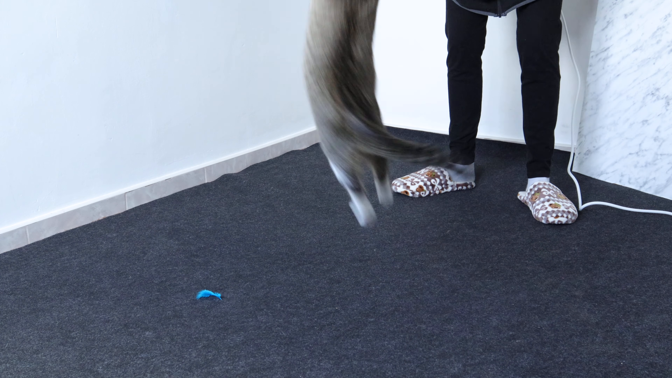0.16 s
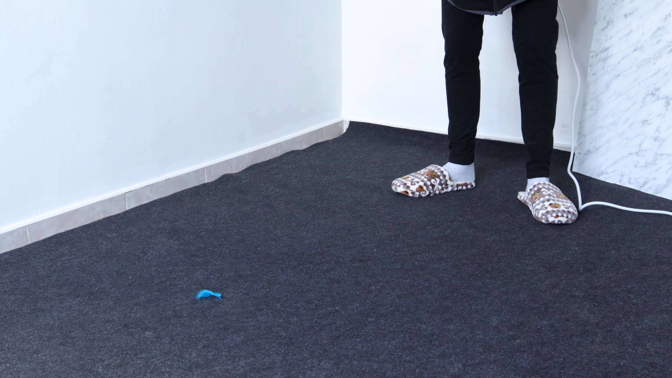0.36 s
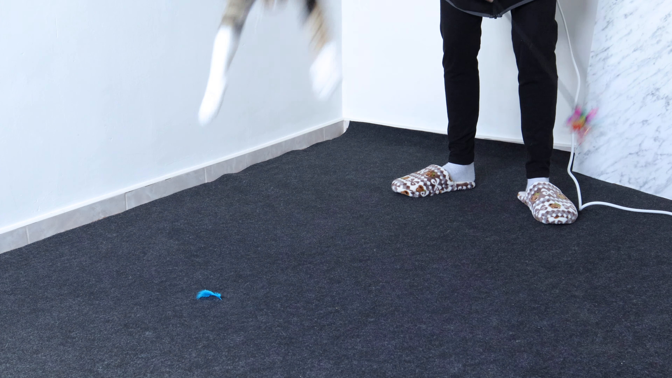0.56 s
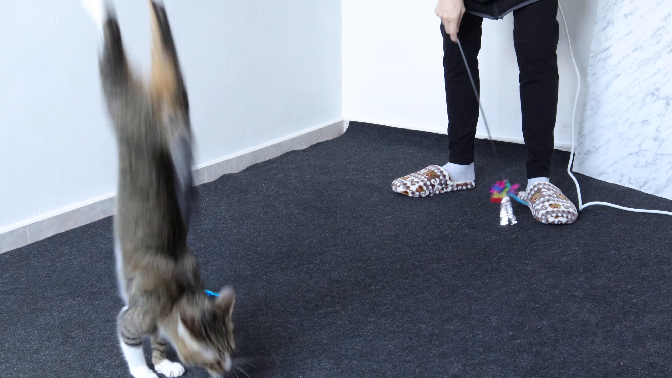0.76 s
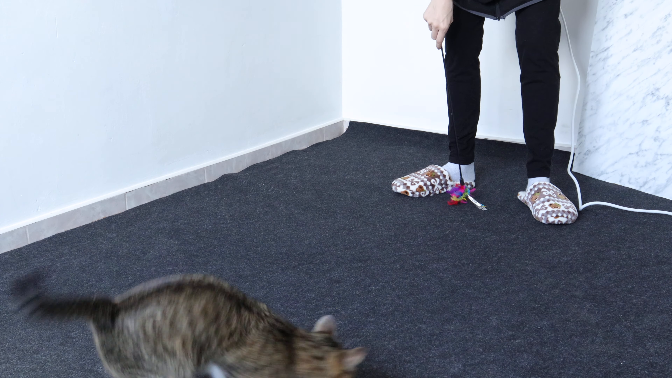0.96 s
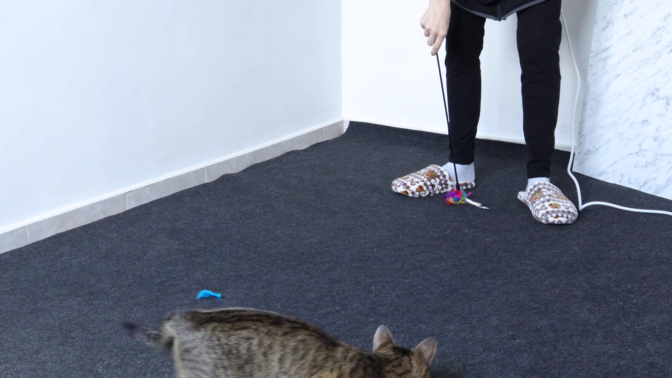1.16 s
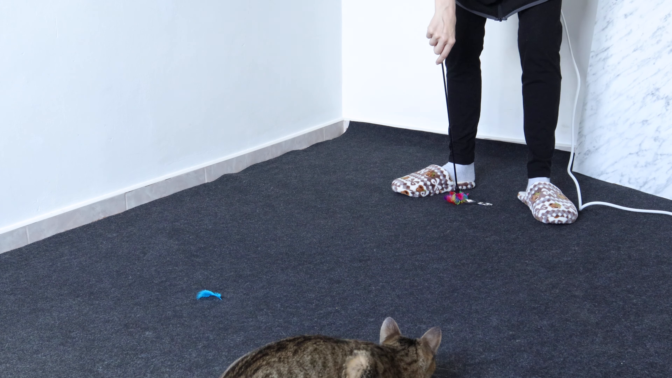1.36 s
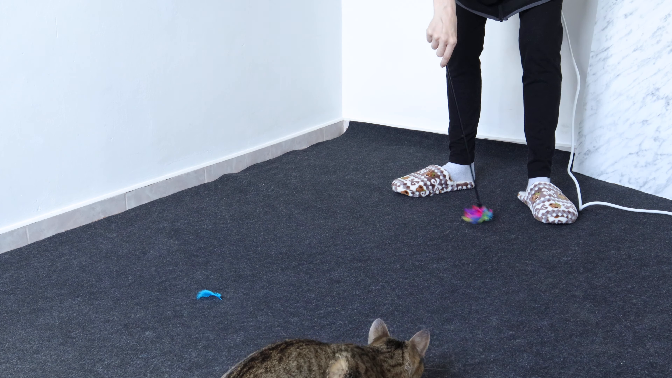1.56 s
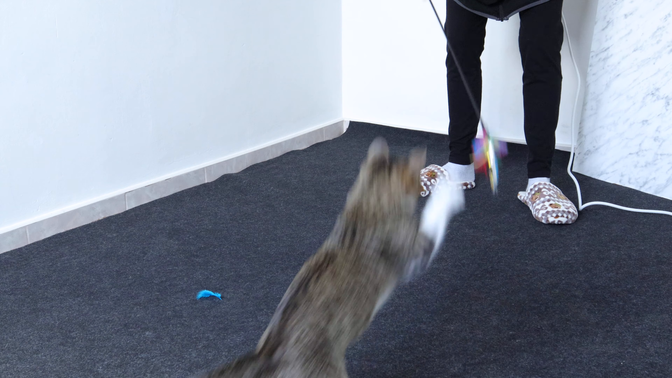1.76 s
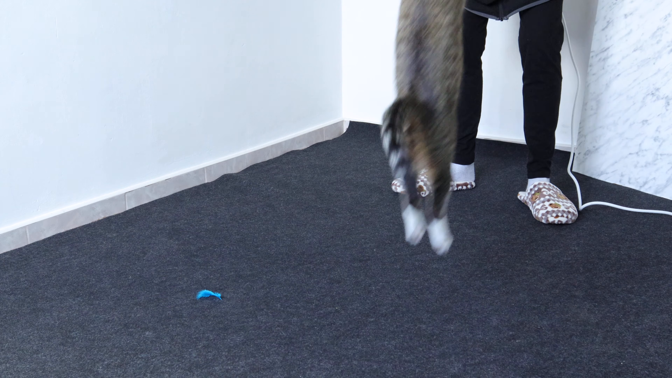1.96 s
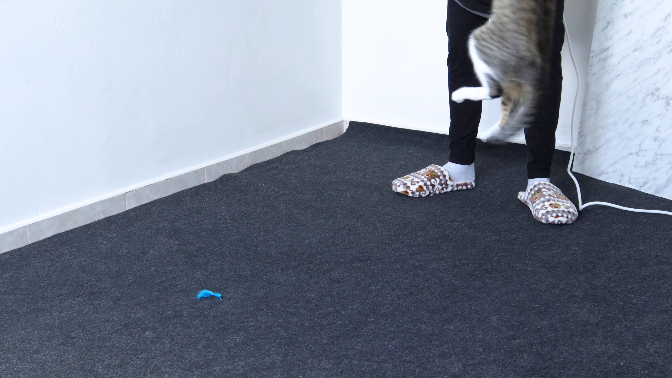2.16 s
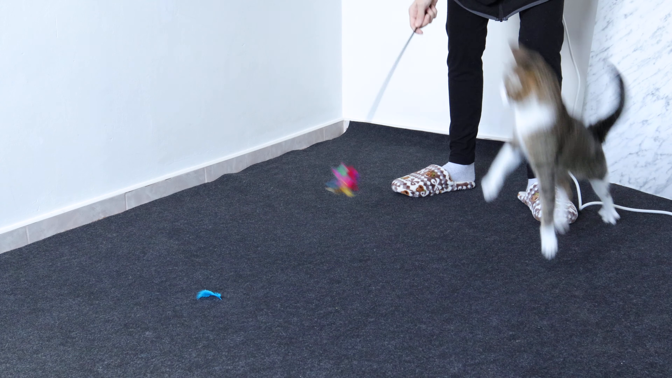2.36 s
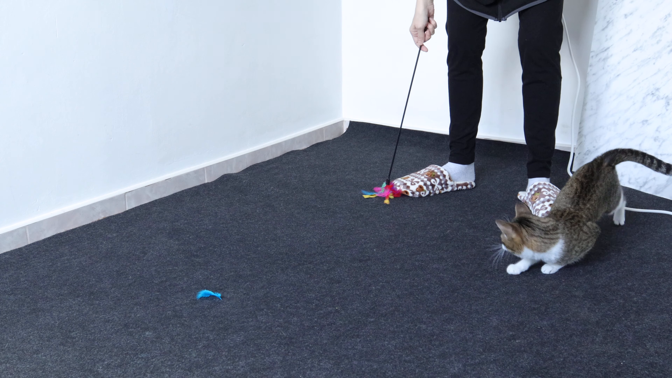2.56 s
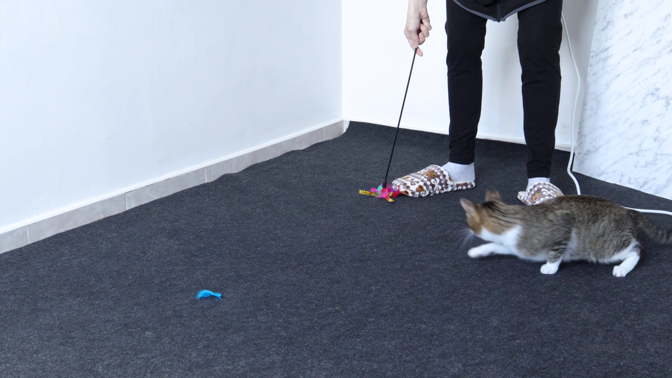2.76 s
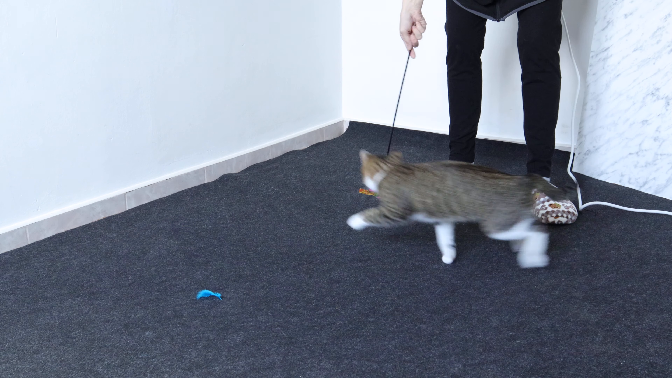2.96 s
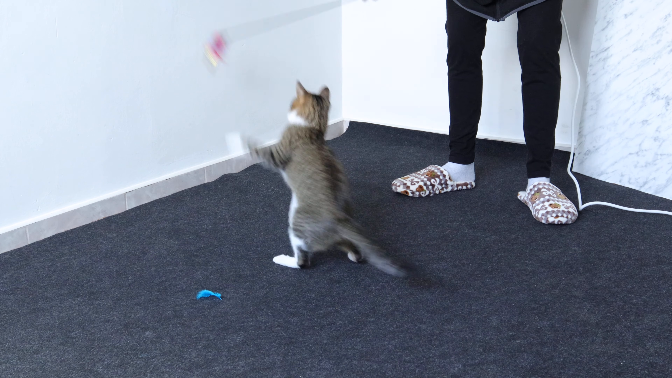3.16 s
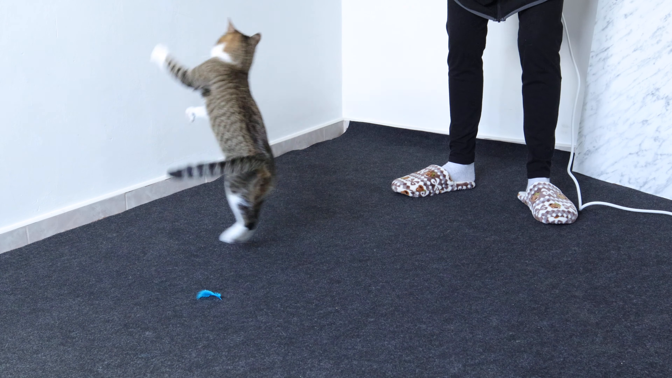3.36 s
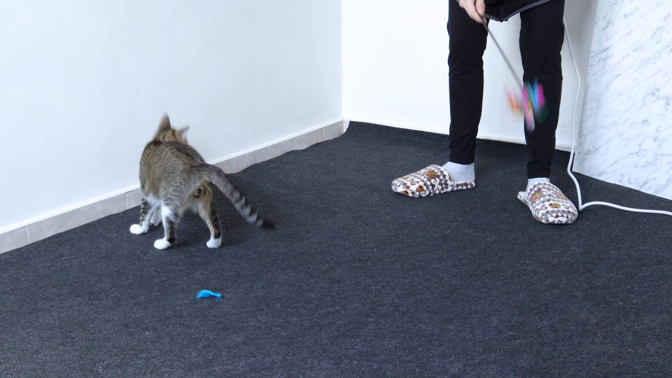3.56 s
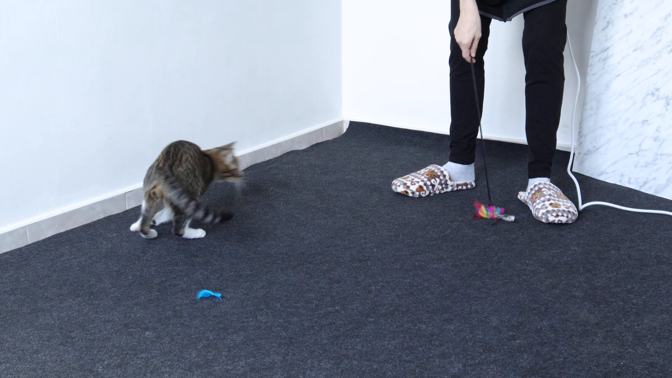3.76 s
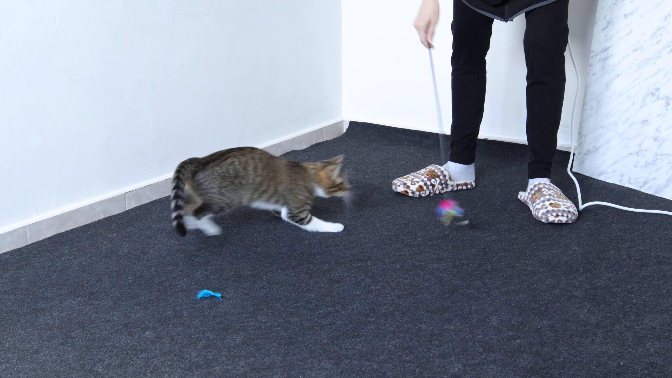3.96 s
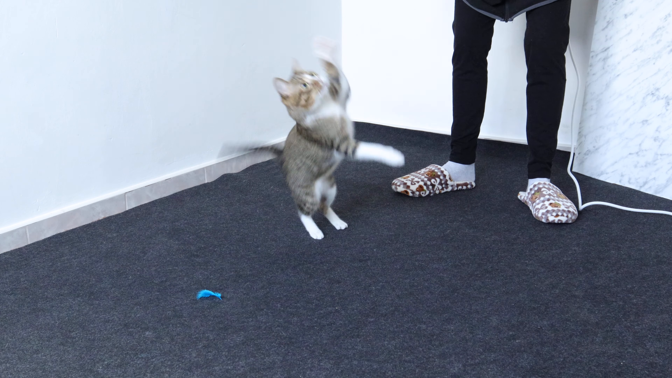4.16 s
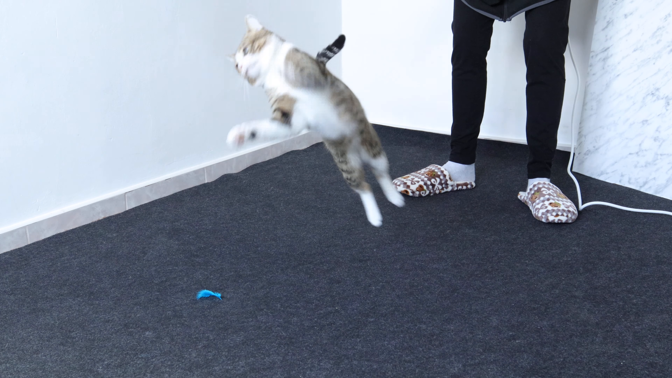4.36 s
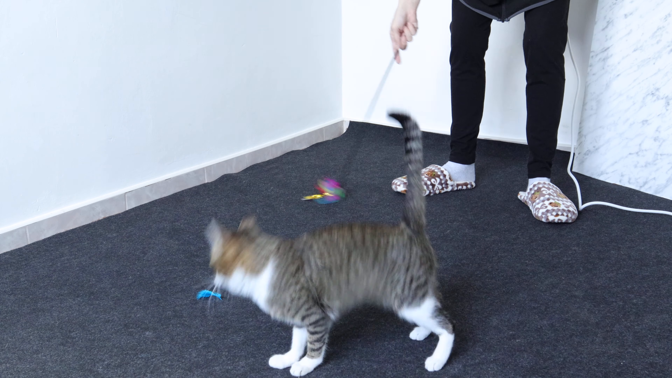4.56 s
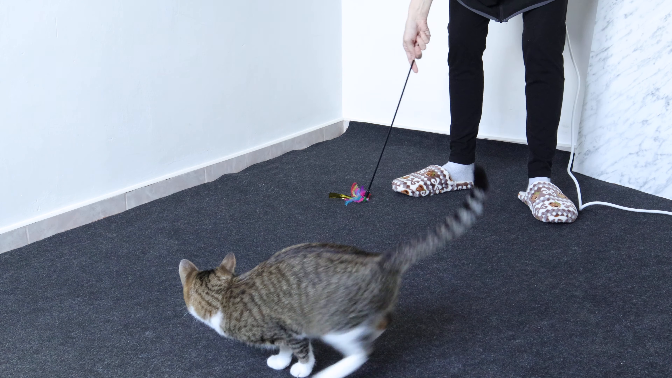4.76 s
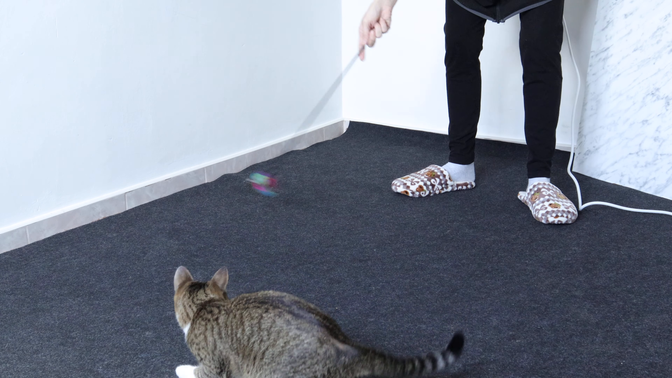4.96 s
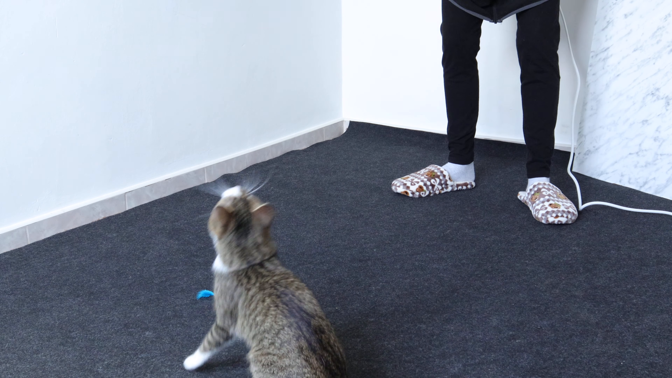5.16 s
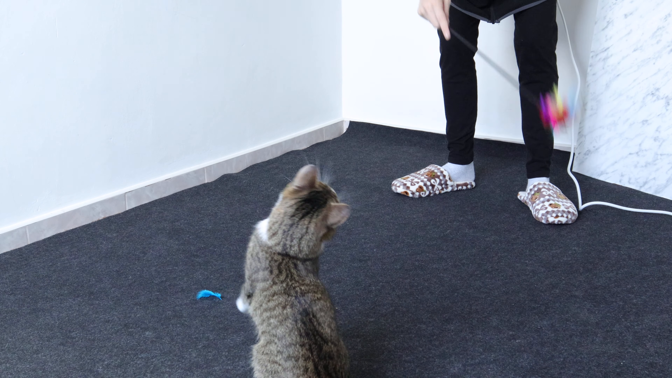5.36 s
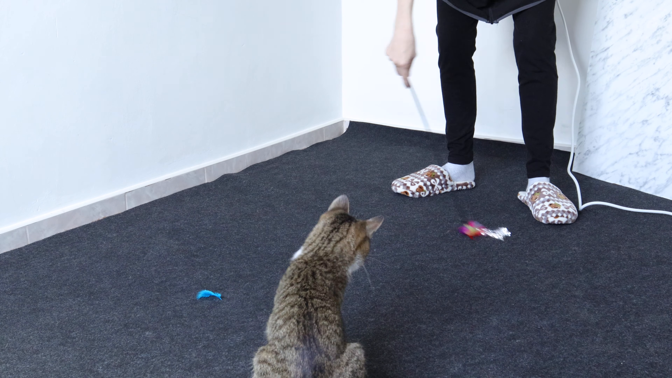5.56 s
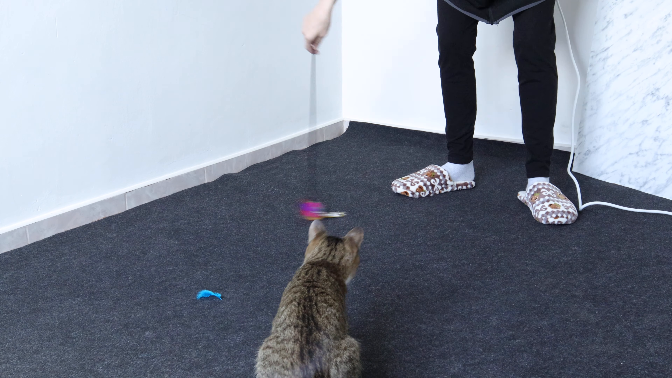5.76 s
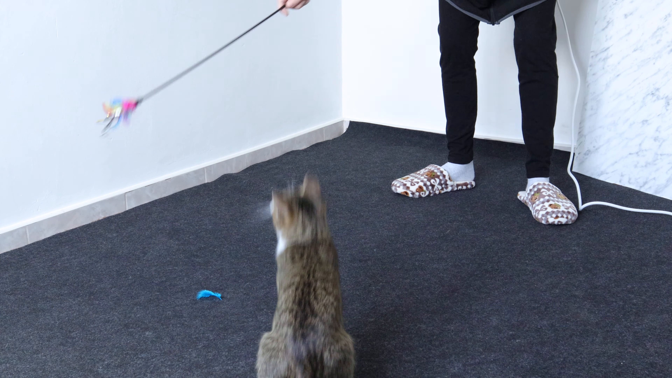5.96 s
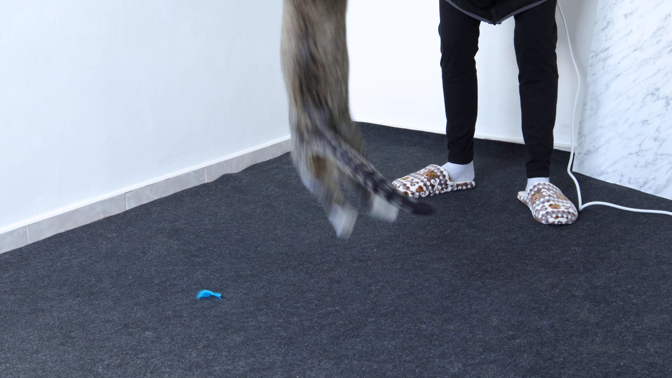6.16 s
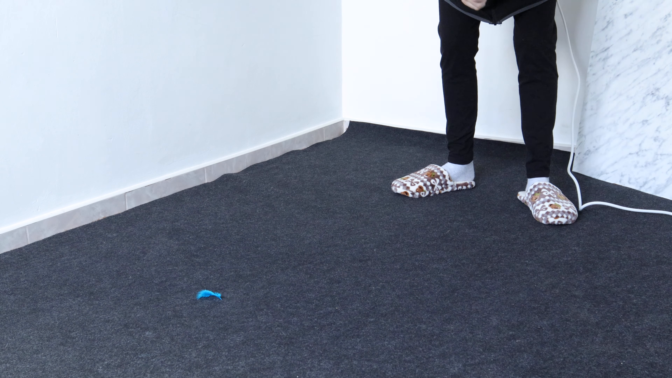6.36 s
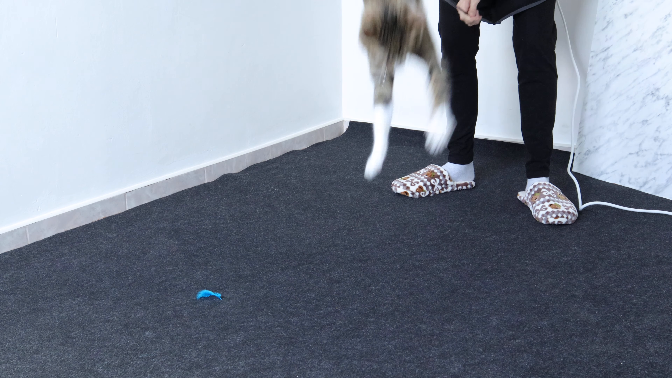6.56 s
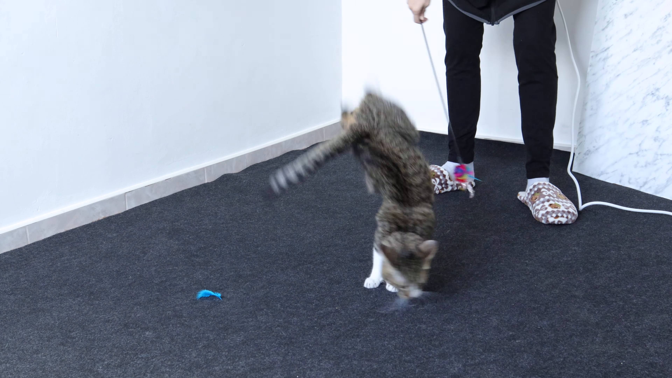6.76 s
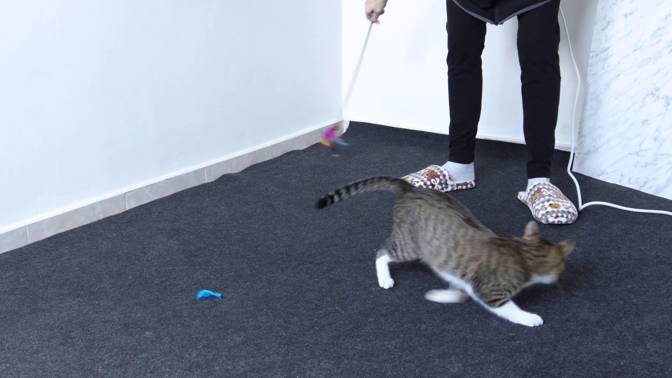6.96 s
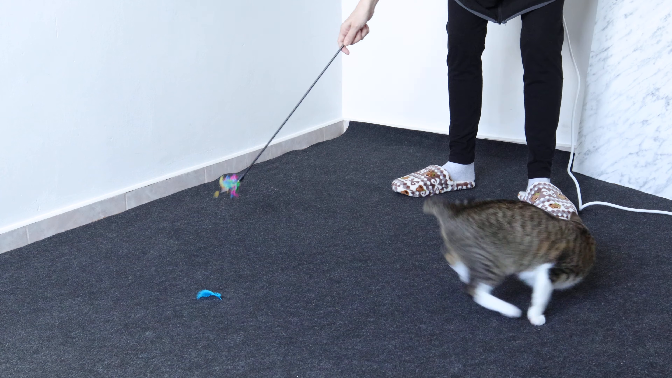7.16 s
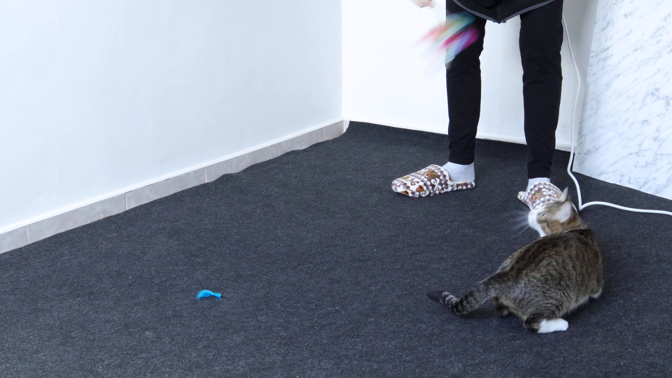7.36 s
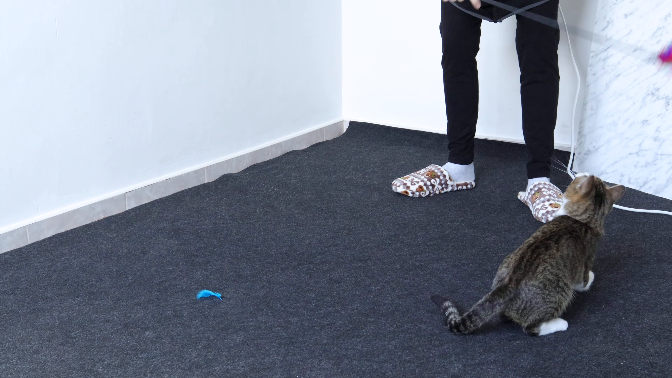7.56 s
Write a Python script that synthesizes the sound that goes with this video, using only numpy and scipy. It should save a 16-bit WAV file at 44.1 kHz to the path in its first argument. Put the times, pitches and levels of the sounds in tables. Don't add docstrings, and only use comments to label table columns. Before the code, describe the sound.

Close stereo pickup in a small bare room: low room tone and faint microphone hiss. A light foil swish opens, with tiny ticks at 0.3-0.4 s. At 0.87 s the cat lands in a heavy, dull double thump on thin carpet, with low floor resonance and brief scuffing. From 1 to 2.4 s it is mostly quiet: small crinkles, a claw tick and soft push-off at 1.8, a foil snap at 1.97. At 2.52 comes the loudest landing, two quick thuds with a sharp claw scratch. Scampering pats and scrapes follow, with a deep knock near 3.25 and lighter thuds at 3.65 and 4.2. A firm thump lands at 4.66, then a bright swish at 5.03 and sparse rustles. Foil crackles vividly from 6.23 to 6.6; the cat lands at 6.82, scuffs and snaps foil around 7, then fades into small steps.

```python
import sys
import numpy as np
from scipy import signal
from scipy.fft import rfft, irfft, next_fast_len
from scipy.io import wavfile
from scipy.ndimage import uniform_filter1d

SR = 44100
rng = np.random.default_rng(int(sys.argv[2]) if len(sys.argv) > 2 else 0)


def invert_db(level):
    return 10 ** (np.asarray(level, dtype=float) / 20)


def unload_wav(signal):
    wavfile.write(
        sys.argv[1],
        SR,
        np.round(np.clip(np.atleast_2d(signal).T, -1, 1) * 32767).astype(np.int16),
    )


N = 336042

# (frequency [Hz], density [dB per Hz])
AIR_SPECTRUM = [(12, -31), (20, -8), (202, -1.5), (266, -2), (315, -2.5), (439, -5), (631, -4.5),
                (1160, -9.5), (1450, -9.5), (1820, -11), (2150, -12.5), (9930, -28), (11100, -49),
                (13100, -64), (15500, -72)]
# (frequency [Hz], coherence [-1 to 1])
AIR_LIKENESS = [(60, 1), (130, 0.43), (290, -0.27), (640, -0.5), (1410, -0.61), (3100, -0.7), (6820, -0.69),
                (15000, -1.1)]
# (frequency [Hz], density [dB per Hz])
SLAB_SPECTRUM = [(20, -48), (40, -9), (54, 11.5), (72, -6), (105, 6.5), (150, -2.2), (230, -33), (500, -78)]
# (peak time [s], level [dB], fall over 20 dB [s])
SHAKES = [(0.06, -46, .5), (0.87, -33, .33), (1.34, -50, .2), (1.9, -50, .32), (2.525, -29, .22),
          (2.82, -46, .55), (3.185, -38, .2), (3.265, -31, .14), (3.5, -51, .4), (3.61, -46, .2),
          (3.67, -38, .23), (4.06, -51, .5), (4.21, -42, .11), (4.46, -56, .2), (4.52, -44.5, .8),
          (4.73, -45, .22), (5.24, -54, .12), (5.6, -59, .9), (6.2, -50, .5), (6.83, -30, .13),
          (7.04, -40, .2), (7.3, -53, 2.2)]
# (frequency [Hz], density [dB per Hz])
HISS_SPECTRUM = [(1500, -16), (3000, -9), (4800, -8), (6800, -8), (8800, -3), (10700, 0), (13200, -14),
                 (15600, -26)]
# (frequency [Hz], density [dB per Hz])
RASP_SPECTRUM = [(150, -47), (300, -14), (700, -6), (1200, -2.5), (2400, -2.5), (3500, -7), (6000, -13),
                 (12000, -52)]
# (peak time [s], hiss level [dB], rasp level [dB re hiss], rise [s], fall over 20 dB [s])
STROKES = [(0.91, -51, 6, .055, .25), (1.59, -62, 3, .6, .3), (1.7, -51, 4.5, .12, .4),
           (1.975, -46, 4.5, .03, .18), (2.06, -59, -3, .06, .12), (2.57, -37.5, 9, .06, .1),
           (2.66, -53, 7, .08, .45), (2.84, -56, 9, .035, .16), (2.97, -47, 6.5, .04, .12),
           (3.18, -45, 8, .015, .15), (3.27, -52, 7, .04, .2), (3.36, -56, 7, .04, .15),
           (5.68, -52, 6, .025, .15), (3.84, -45, -3, .016, .16), (3.9, -46.5, -1.5, .05, .08),
           (1.19, -65, 11, .03, .15), (4.095, -46, 11.5, .03, .12), (4.2, -47, 2, .09, .12),
           (4.68, -55, 13, .04, .16), (5.14, -57, 3, .08, .25), (5.69, -52, 1.5, .035, .5),
           (5.92, -58, 5, .2, .2), (6.825, -45, 9, .017, .12), (7.03, -39.5, 3, .06, .085),
           (7.17, -52, .3, .02, .09), (7.4, -59.5, 4.5, .3, .6)]
# (peak time [s], hiss level [dB], rasp level [dB re hiss], rise [s], fall over 20 dB [s])
SWEEPS = [(0.04, -43, -4.5, .2, .11), (0.385, -55, -18, .015, .15), (2.25, -59.5, -12, .05, .3),
          (2.52, -42, -5, .011, .2), (2.78, -47.5, -23, .025, .17), (3.15, -40.5, -17, .06, .15),
          (3.585, -45.5, -19, .035, .1), (4.035, -49, -2.5, .015, .4), (4.41, -51.5, -1.2, .1, .09),
          (4.32, -52, -5, .03, .15), (4.73, -44.5, -6, .05, .09), (5.03, -36.5, -4, .028, .11),
          (5.4, -57.5, -19, .015, .15), (5.96, -50.5, -9, .015, .2), (6.07, -46.5, -4.5, .04, .16),
          (6.24, -36.5, -3.5, .013, .3), (6.32, -32, -6, .07, .08), (6.465, -33, -5, .06, .16),
          (6.39, -37, -6, .04, .2), (6.58, -40, -5, .02, .1), (6.75, -54, -5, .15, .06),
          (6.94, -35, -6.5, .02, .07)]
# (time [s], peak level [dB], pitch [Hz])
KNOCKS = [
    (0.035, -41, 118),
    (0.959, -39.5, 45.8),
    (1.929, -44, 53.6),
    (3.259, -22, 112),
    (3.31, -32, 105),
    (4.209, -34, 101),
    (4.444, -36, 60.5),
    (6.929, -31.5, 58),
]
# (time [s], peak level [dB], body level [dB re top])
CLAWS = [(1.066, -52, 14), (1.5155, -42, -8), (1.5893, -48, -7), (1.7893, -38, 9), (2.5172, -14, 2.5),
         (2.7591, -31.5, -5), (2.9188, -40, 0), (2.9532, -33, 1.5), (3.1782, -28, -4), (3.2485, -32, 4),
         (4.0272, -43, -9), (4.0876, -33, 6), (4.0827, -39, 6), (4.6927, -39, -9), (5.6605, -42, 1),
         (5.69, -35, -4), (6.0437, -42, 0), (6.8179, -31, 10), (7.1616, -41, -7), (7.3587, -52, 7)]
# (time [s], peak level [dB], body level [dB re top])
FOIL = [(0.2922, -42, -18), (0.3865, -38.5, -28), (1.3084, -38, -23), (1.6876, -36.5, -20),
        (1.9689, -23, -24), (1.955, -41, -15), (2.2428, -43, -22), (2.2992, -41.5, -21), (3.1123, -42, -21),
        (3.8342, -31, -14), (4.2956, -34, -23), (4.9776, -39, -18), (5.014, -34, -17), (5.3882, -39, -23),
        (5.7438, -35, -16), (5.9504, -36, -32), (6.2282, -16.5, -12), (6.3644, -25.5, -24),
        (6.568, -29, -24), (6.9282, -23.5, -17), (6.9895, -29, -17), (1.352, -47, -25), (1.412, -41, -25),
        (1.448, -42, -25), (1.633, -43, -20), (1.87, -44, -20), (2.192, -47, -25), (2.556, -23, -12),
        (5.2, -43, -15)]
# (time [s], peak level [dB], pitch [Hz], fade [s])
PATS = [(0.855, -24, 1487, 0.022), (.862, -20, 520, 0.038), (.876, -8, 310, .012), (.896, -17, 430, .012),
        (.97, -23, 300, .015), (1.065, -45, 1480, .012), (1.09, -33, 350, .02), (1.17, -48, 1780, .025),
        (1.684, -46, 2030, .03), (1.771, -32.5, 456, 0.027), (1.785, -40, 2093, 0.023),
        (2.534, -11, 340, .012), (2.546, -16, 690, .015), (2.61, -17, 440, .025), (2.82, -40, 898, 0.045),
        (2.939, -30, 914, 0.028), (2.95, -36.5, 401, 0.04), (3.006, -31, 922, 0.028), (3.02, -43, 420, .03),
        (3.172, -31, 380, 0.02), (3.172, -34, 190, .05), (3.196, -27, 395, 0.02), (3.25, -36, 1350, .025),
        (3.285, -30, 470, .02), (3.545, -43.5, 434, 0.032), (3.652, -30, 448.5, 0.025),
        (3.739, -36, 200, 0.027), (4.03, -42, 201.6, 0.038), (4.078, -38, 847, 0.016),
        (4.088, -33, 1400, .018), (4.198, -36, 1350, .015), (4.09, -32.5, 304, 0.02),
        (4.236, -33, 440, 0.023), (4.645, -28, 450, 0.017), (4.655, -39, 1600, .05), (4.72, -32, 520, .025),
        (5.015, -35.5, 2450, 0.033), (6.808, -29, 644, 0.034), (6.815, -31.5, 1030, 0.03),
        (6.86, -25, 480, .03), (7.015, -37.5, 908, 0.027), (7.021, -34, 1500, .012),
        (7.175, -41.5, 1294, 0.017), (7.20, -41, 1040, 0.031), (7.352, -40.5, 385, 0.036)]
# (time [s], peak level [dB], centre [Hz], fade [s])
BRUSHES = [(0.868, -20, 450, .035), (1.769, -28, 1520, 0.0039), (2.509, -27, 3800, 0.013),
           (2.51, -22, 750, .015), (2.548, -17, 600, .025), (2.95, -38, 2200, .05), (4.655, -31, 420, .03),
           (6.809, -31, 800, .03), (6.82, -27, 400, .04), (7.357, -44.5, 1495, 0.033)]
# (time [s], peak level [dB], centre [Hz], fade [s])
CREASES = [(1.689, -40, 8000, .004), (1.79, -42, 6000, .003), (1.865, -46, 10500, .01),
           (1.954, -40, 9000, .003), (1.968, -32, 9700, .006), (2.765, -36, 9500, .005),
           (2.9535, -32, 9200, .003), (2.963, -35, 9000, .003), (2.985, -38, 4500, .006),
           (3.149, -32, 10300, .004), (3.15, -38, 3800, .006), (3.37, -42, 3200, .015),
           (3.558, -40, 10000, .003), (3.585, -42, 8500, .012), (4.034, -39, 9000, .004),
           (4.41, -44, 9000, .012), (4.678, -42, 10300, .006), (4.70, -38, 10300, .008),
           (4.978, -40, 10000, .004), (5.667, -41, 5800, .008), (5.931, -43, 9500, .006),
           (5.951, -33, 8300, .006), (6.068, -39, 10500, .006), (6.236, -22, 3000, .003),
           (6.238, -26, 11000, .003), (6.248, -26, 2800, .004), (6.284, -28, 9000, .008),
           (6.314, -25, 10500, .004), (6.3655, -23, 11000, .002), (6.386, -29, 9500, .004),
           (6.408, -29, 8500, .004), (6.458, -29, 6000, .004), (6.934, -29, 10000, .005),
           (7.165, -43, 10000, .012)]
# (time [s], peak level [dB], centre of the blow [Hz], slap level [dB re blow], ring [factor on T60])
PAWS = [(0.865, -6.5, 325, -24, 0.9), (0.913, -14, 300, -24, 0.9), (1.305, -47, 503, -7.5, 0.77),
        (2.516, -6.5, 420, -21, 1.15), (2.554, -4, 400, -20, 0.9), (2.826, -33, 300, -13, 1.5),
        (3.244, -18.5, 350, -24, 0.9), (3.657, -26.5, 185, -23, 0.41), (3.699, -30.5, 199, -23, 0.72),
        (4.2, -28.5, 375, -23, 0.7), (4.664, -11.5, 350, -28, 0.58), (4.709, -25.5, 286, -16.5, 0.8),
        (6.823, -15, 400, -23, 0.75), (6.844, -17, 280, -20, 0.95), (7.01, -29, 260, -14, 1.3),
        (7.243, -45, 393, -13, 1.2)]
# (frequency [Hz], level [dB], T60 [s])
MODES = [(50, -13, 0.55), (112.6, -23.5, 0.5), (205.3, -2, 0.42), (254.5, -2.5, 0.13), (291.6, 2.2, 0.26),
         (339.9, -2, 0.18), (378.8, -2.44, 0.21), (420, -0.7, 0.19), (491.2, -6, 0.19), (600, -18.5, 0.3),
         (660, -16, 0.46), (780, -14.5, 0.55), (872, -22.5, 0.19), (1025, -8.5, 0.1)]
# (frequency [Hz], density [dB per Hz])
SLAP_SPECTRUM = [(200, -13), (600, 4.5), (900, -1.5), (1200, -4), (1550, -2.5), (2200, -11.5), (4000, -27),
                 (9000, -42), (13000, -70)]
# (frequency [Hz], T60 [s])
ROOM_T60 = [(60, 0.7), (250, 0.61), (800, 0.34), (3000, 0.32), (10000, 0.18)]
# (frequency [Hz], coherence [-1 to 1])
SCUFF_LIKENESS = [(60, 0.84), (110, 0.67), (200, 0.15), (380, 0.38), (700, 0.5), (1290, 0.86), (2380, 0.85),
                  (4400, 0.33), (8120, -0.23), (15000, -0.69)]
# (frequency [Hz], coherence [-1 to 1])
LANDING_LIKENESS = [(60, 1), (130, 0.99), (290, 0.99), (640, 0.97), (1410, 0.95), (3100, 0.71),
                    (6820, -0.39), (15000, -0.48)]


def evened(x):
    return x / np.sqrt(np.mean(x ** 2) + 1e-20)


def read(points, hz):
    f, value = np.transpose(points)
    return np.interp(np.log(hz + 1), np.log(f + 1), value)


def add(mix, s, sound):
    part = mix[..., round(s * SR):][..., :sound.shape[-1]]
    part += sound[..., :part.shape[-1]]


def colour(x, points):
    n = next_fast_len(x.shape[-1])
    gain = evened(invert_db(read(points, np.fft.rfftfreq(n, 1 / SR))))
    return irfft(rfft(x, n) * gain, n)[..., :N]


def ports(pair, likeness):
    n = next_fast_len(pair.shape[1])
    c = np.clip(read(likeness, np.fft.rfftfreq(n, 1 / SR)), -1, 1)
    mid, side = rfft(pair, n) * np.sqrt([(1 + c) / 2, (1 - c) / 2])
    return irfft(np.array([mid + side, mid - side]), n)[:, :N]


def fibres(n, per_s, spread_db, bed):
    size = invert_db(spread_db * np.minimum(rng.exponential(1, n), 5))
    size *= rng.random(n) < per_s / SR
    lumps = uniform_filter1d(size, size=24)
    return evened((bed + evened(lumps)) * rng.standard_normal((2, n)))


def room(pair, wet_db):
    taps = rng.choice([-1., 1.], (2, SR // 2))
    taps *= rng.random((2, SR // 2)) < 3000 / SR
    hz, t, z = signal.stft(taps, SR, nperseg=256)
    decay = invert_db(-60 * t / read(ROOM_T60, hz)[:, None])
    tail = signal.istft(z * decay, SR, nperseg=256)[1]
    tail *= invert_db(wet_db) / np.linalg.norm(tail[0])
    return pair + signal.fftconvolve(pair, tail, axes=1)[:, :N]


def swells(rows, rest_db):
    s, db, rise, fall = np.transpose(rows)[:, :, None]
    t = np.arange(0, N / SR + .01, .002)
    onset = np.clip(1 + (t - s) / rise, 0, 1)
    gain = onset * invert_db(db - 20 * np.maximum(t - s, 0) / fall)
    total = np.sqrt((gain ** 2).sum(0) + invert_db(rest_db) ** 2)
    return np.interp(np.arange(N) / SR, t, total)


def patchy(x, depth_db, bins, frames):
    z = signal.stft(x, nperseg=512)[2]
    patches = uniform_filter1d(rng.standard_normal(z.shape[1:]), size=bins, axis=0)
    patches = evened(uniform_filter1d(patches, size=frames, axis=1))
    return signal.istft(z * invert_db(depth_db * patches), nperseg=512)[1][:, :N]


def air():
    noise = colour(rng.standard_normal((2, N)), AIR_SPECTRUM)
    return invert_db(-48.24) * ports(patchy(noise, 1.64, bins=8, frames=10), AIR_LIKENESS)


def rumble():
    rise_s = 0.016
    shaken = swells([(s, db - 1.5, rise_s, fall) for s, db, fall in SHAKES], rest_db=-62)
    return shaken * colour(rng.standard_normal((2, N)), SLAB_SPECTRUM)


def scuffs():
    rows = STROKES + SWEEPS
    hiss = colour(fibres(N, per_s=2300, spread_db=5.0, bed=2.5), HISS_SPECTRUM)
    rasp = colour(fibres(N, per_s=500, spread_db=3.0, bed=2.9), RASP_SPECTRUM)
    hiss = patchy(hiss, 2.2, bins=30, frames=7)
    rasp = patchy(rasp, 1.5, bins=30, frames=7)
    hiss_rows = [(s, db + 2.25, rise, fall) for s, db, _, rise, fall in rows]
    rasp_rows = [(s, db + rasp_db - 1.55, rise, 1.15 * fall) for s, db, rasp_db, rise, fall in rows]
    return hiss * swells(hiss_rows, rest_db=-69.5) + rasp * swells(rasp_rows, rest_db=-63)


def heel_knocks():
    out, t = np.zeros((2, N)), np.arange(18000) / SR
    for s, db, hz in KNOCKS:
        envelope = (t / 0.014) * np.exp(1 - t / 0.0092)
        add(out, s - .01, invert_db(db) * np.sin(2 * np.pi * hz * t) * envelope)
    return room(out, -9.5)


def snaps():
    top, body, t = np.zeros((2, N)), np.zeros((2, N)), np.arange(4000) / SR
    rows = [row + (0.013, 0.45) for row in CLAWS] + [row + (0.014, 0.48) for row in FOIL]
    for s, db, body_db, spray_s, tick in rows:
        spray = (1 - np.exp(-t / 0.0025)) * np.exp(-t / spray_s)
        snap = tick * np.exp(-abs(t - .001) / 0.00036) * rng.choice([-1., 1.], (2, len(t)))
        friction = fibres(len(t), per_s=900, spread_db=3.5, bed=1.1)
        slips = invert_db(db - 2.0) * (snap + .6 * spray * friction)
        add(top, s - .0015, slips)
        add(body, s - .0015, invert_db(body_db - 4.5) * slips)
    return room(colour(top, HISS_SPECTRUM) + colour(body, RASP_SPECTRUM), -1.3)


def pats():
    out, t = np.zeros((2, N)), np.arange(9000) / SR
    rows = [row + (0.38,) for row in PATS]
    rows += [row + (0.75,) for row in BRUSHES]
    rows += [row + (0.3,) for row in CREASES]
    for s, db, hz, fade, width in sorted(rows):
        a, b = rng.standard_normal((2, 2, len(t) + 1000))
        pole = np.exp(-np.pi * width * hz / SR)
        wander = signal.lfilter([1], np.poly([pole, pole]), a + 1j * b)[:, 1000:]
        size = evened(abs(wander)) + 0.77
        ring = evened(size * np.cos(np.angle(wander) + 2 * np.pi * hz * t))
        envelope = (1 - np.exp(-t * hz / 1.2)) * np.exp(-t / fade)
        add(out, s, invert_db(db - 3.5) * ring * envelope)
    return room(out, -8.0)


def paws():
    blow, slap = np.zeros((2, N)), np.zeros((2, N))
    t = np.arange(18000) / SR
    f, mode_db, t60 = np.transpose(MODES)[:, :, None]
    for s, db, hz, slap_db, ring in PAWS:
        octaves = 0.73 + 0.007 * db
        near_db = -6.5 * (np.log2(f / hz) / octaves) ** 2
        spot = rng.standard_normal((5, len(f), 1))
        phase = np.array([spot[0], 3 * spot[1]]) - 2 * np.pi * f * 0.01081
        swing = np.sin(2 * np.pi * f * (1 + 0.0227 * spot[2]) * t + phase)
        swing *= 1 + 0.66 * np.cos(2 * np.pi * 14 * spot[3] * t + 3 * spot[4])
        modes = (invert_db(mode_db + near_db - 60 * t / (t60 * ring)) * swing).sum(1)
        modes *= (1 - np.exp(-(t / .007) ** 2)) * (0.28 + np.exp(-t / 0.064))
        add(blow, s - .005, invert_db(db) * modes / abs(modes[0]).max())
        press = (1 - np.exp(-t / 0.003)) * np.exp(-t / 0.016)
        add(slap, s - .007, invert_db(db + slap_db + 6.0) * press * rng.standard_normal((2, len(t))))
    return room(blow, -9.5) + room(colour(slap, SLAP_SPECTRUM), -1.8)


def scene():
    landings = rumble() + heel_knocks() + pats() + paws()
    friction = scuffs() + snaps()
    return air() + ports(friction, SCUFF_LIKENESS) + ports(landings, LANDING_LIKENESS)


def top_cut(x):
    return signal.sosfilt(signal.butter(12, 15980, fs=SR, output="sos"), x)


def record(dry):
    edge_hz = 15850
    lowpass = signal.firwin(255, edge_hz, window=("kaiser", 9), fs=SR)
    mix = signal.oaconvolve(dry, lowpass[None], "same")
    return top_cut(mix)


dry = scene()
out = record(dry)
unload_wav(out)
```